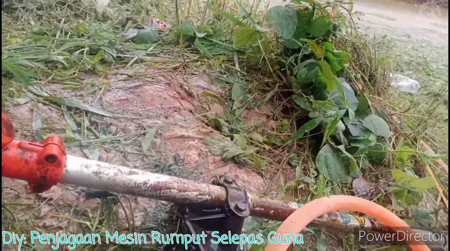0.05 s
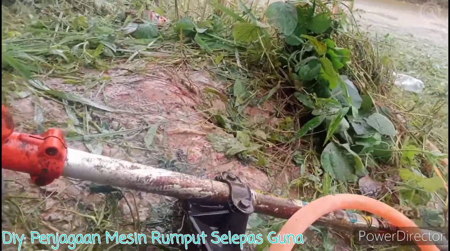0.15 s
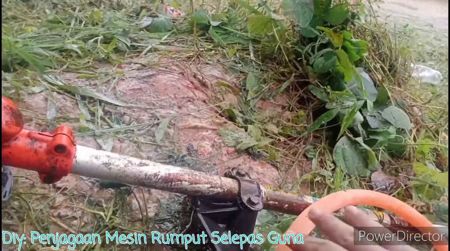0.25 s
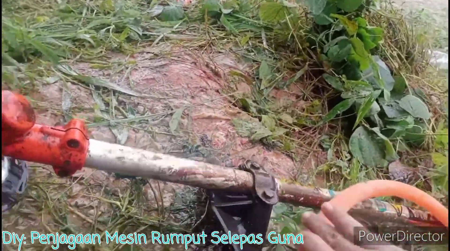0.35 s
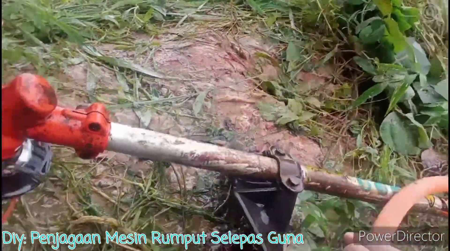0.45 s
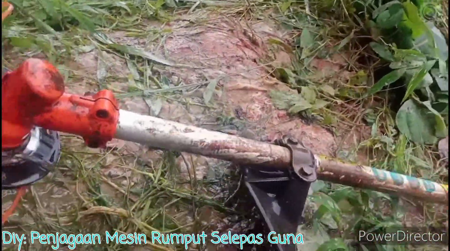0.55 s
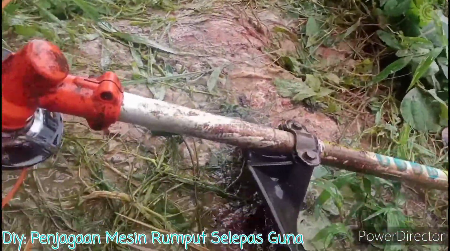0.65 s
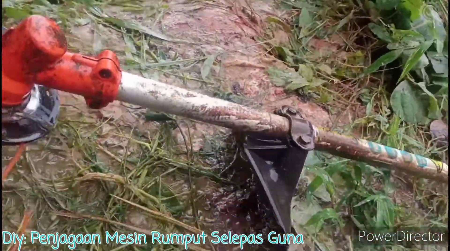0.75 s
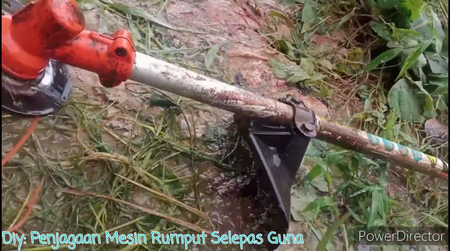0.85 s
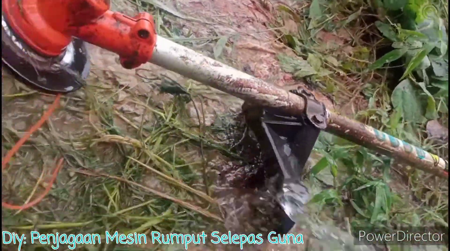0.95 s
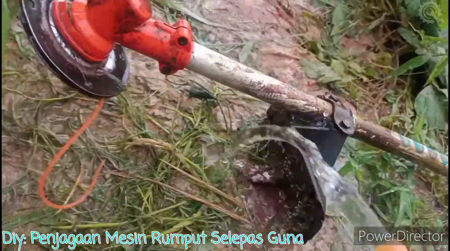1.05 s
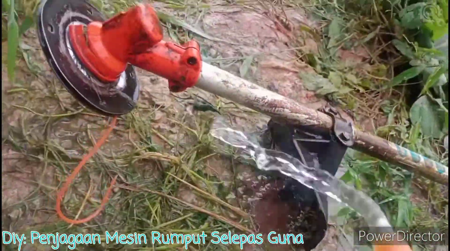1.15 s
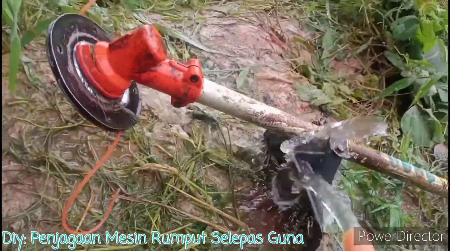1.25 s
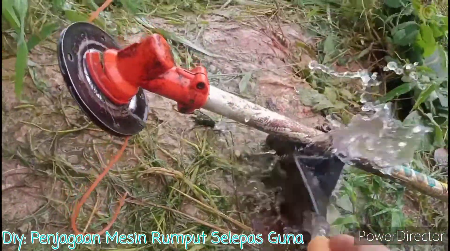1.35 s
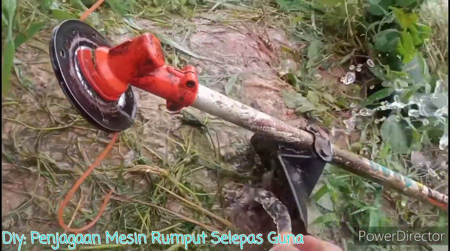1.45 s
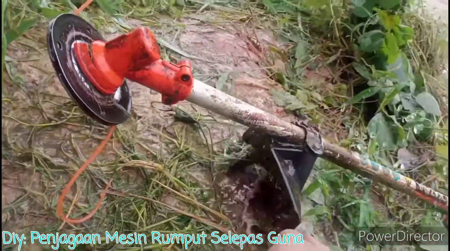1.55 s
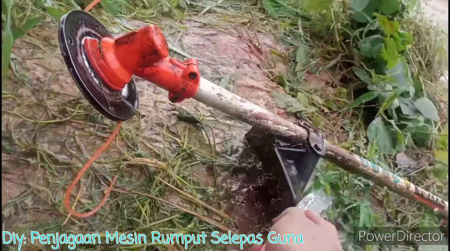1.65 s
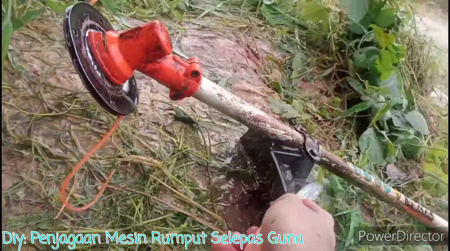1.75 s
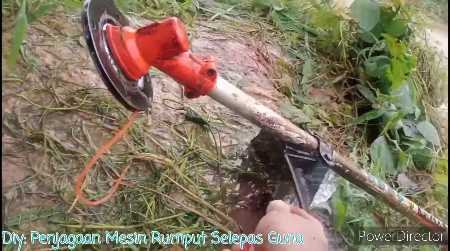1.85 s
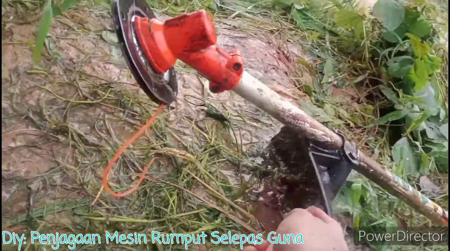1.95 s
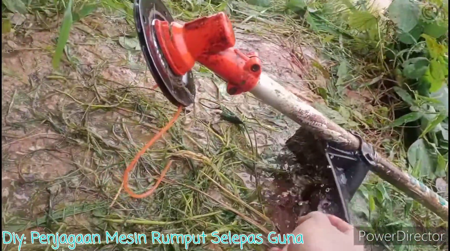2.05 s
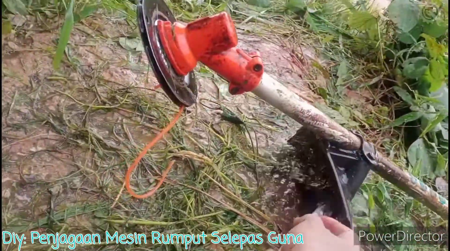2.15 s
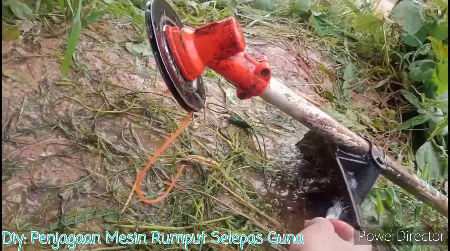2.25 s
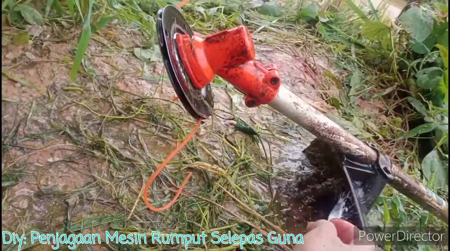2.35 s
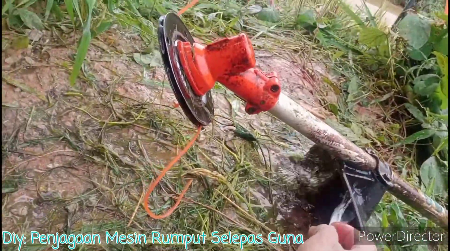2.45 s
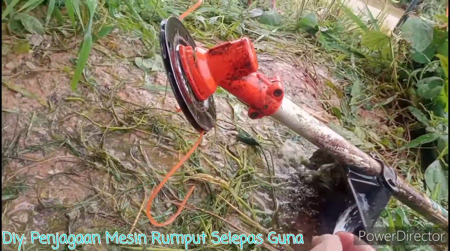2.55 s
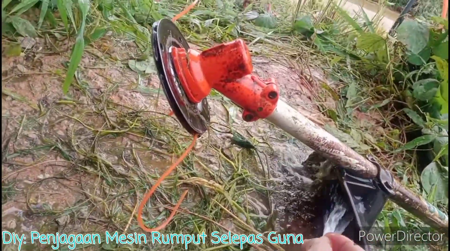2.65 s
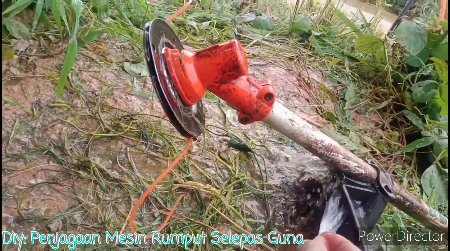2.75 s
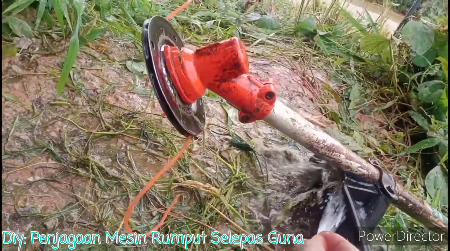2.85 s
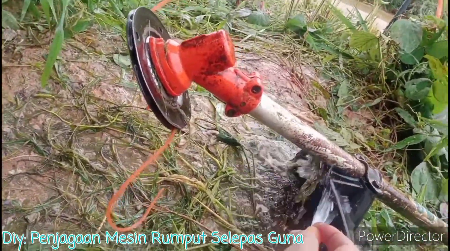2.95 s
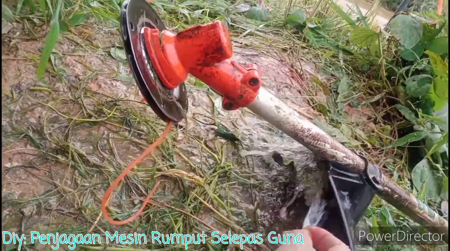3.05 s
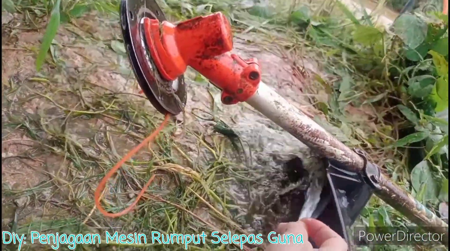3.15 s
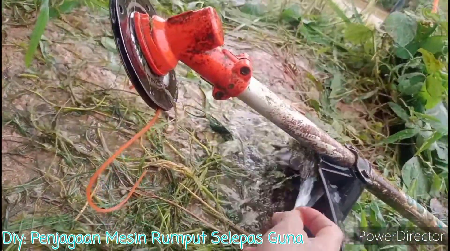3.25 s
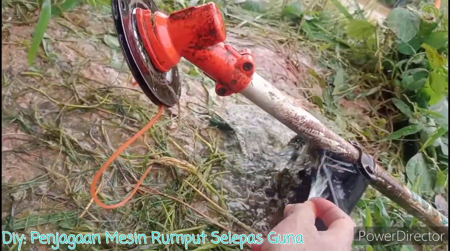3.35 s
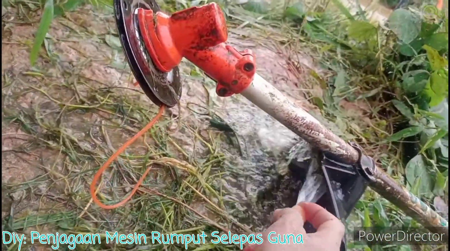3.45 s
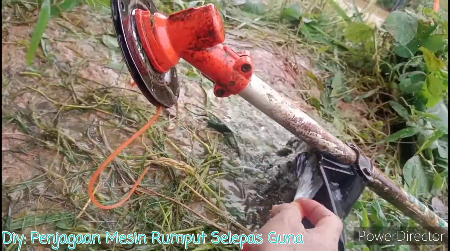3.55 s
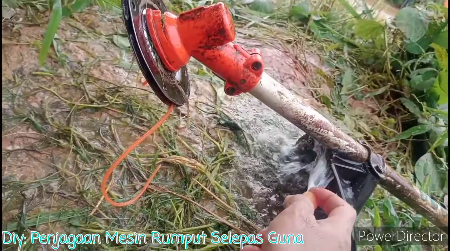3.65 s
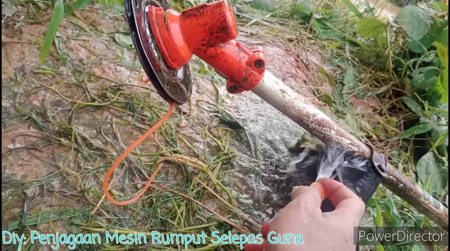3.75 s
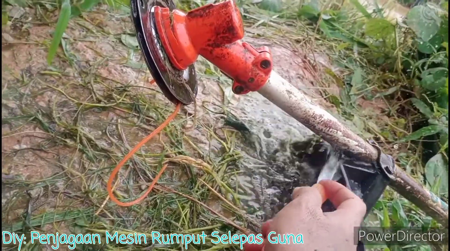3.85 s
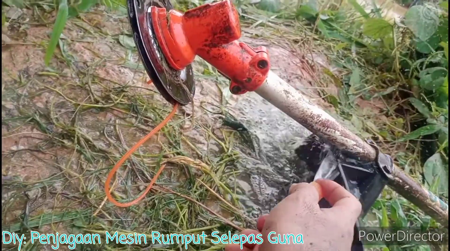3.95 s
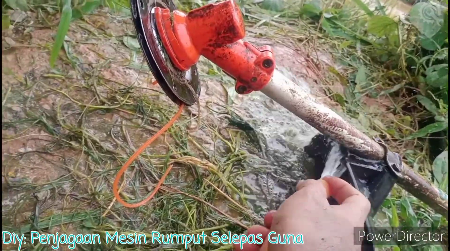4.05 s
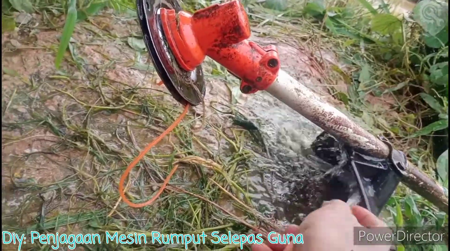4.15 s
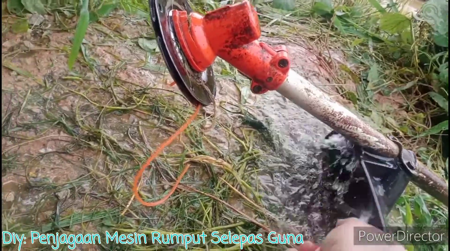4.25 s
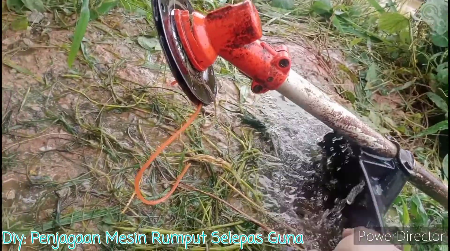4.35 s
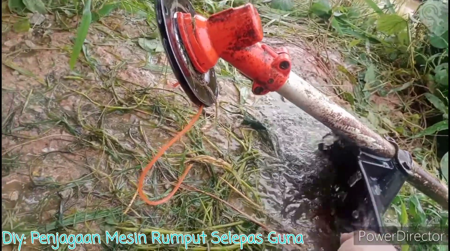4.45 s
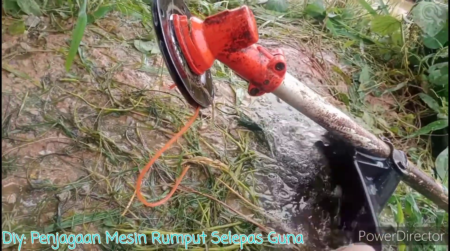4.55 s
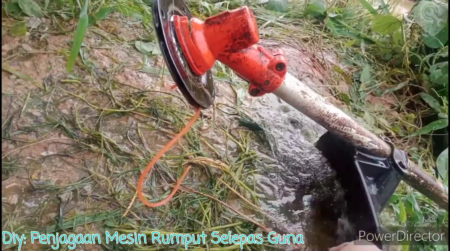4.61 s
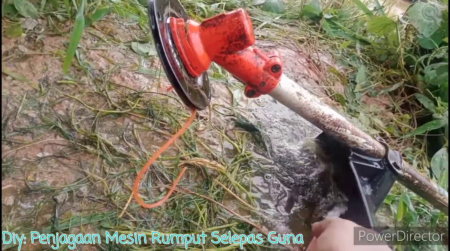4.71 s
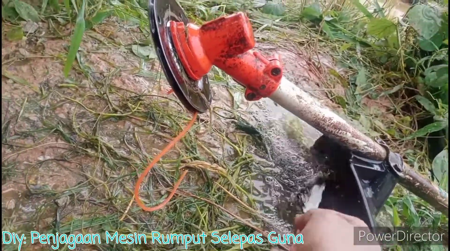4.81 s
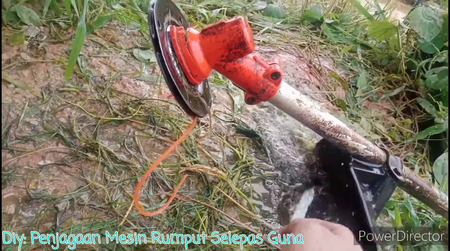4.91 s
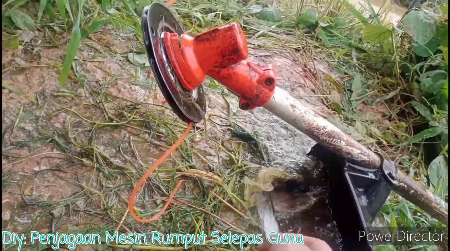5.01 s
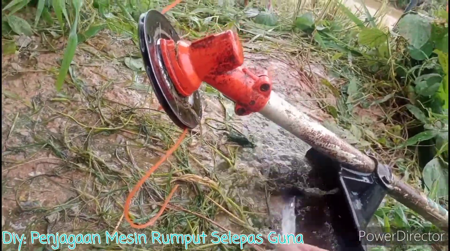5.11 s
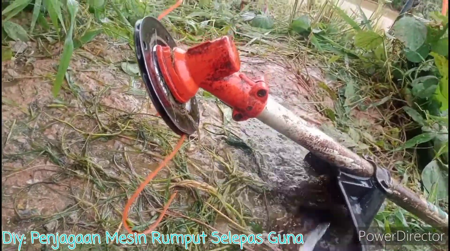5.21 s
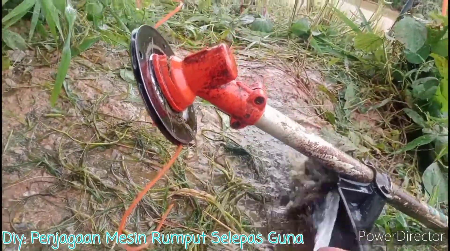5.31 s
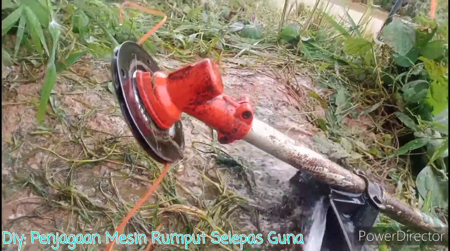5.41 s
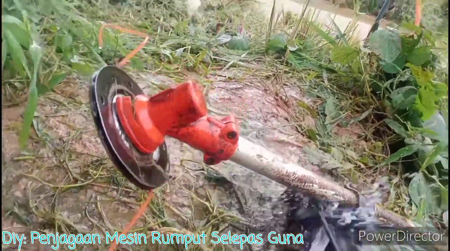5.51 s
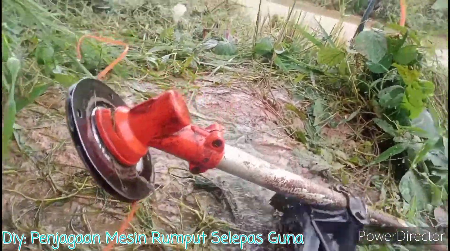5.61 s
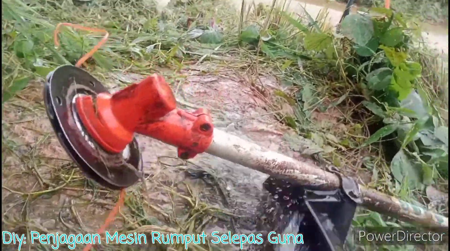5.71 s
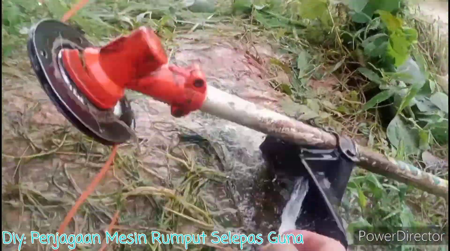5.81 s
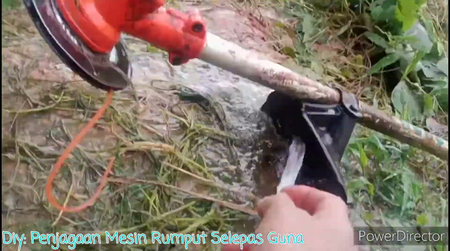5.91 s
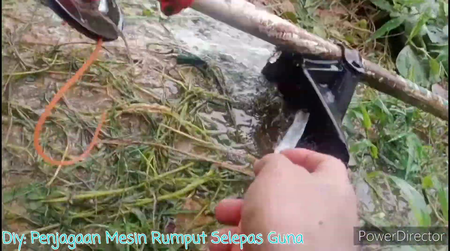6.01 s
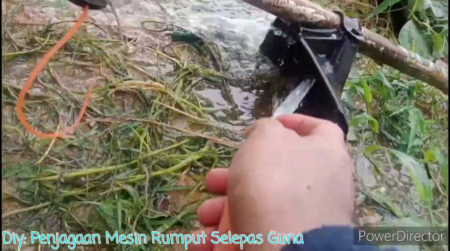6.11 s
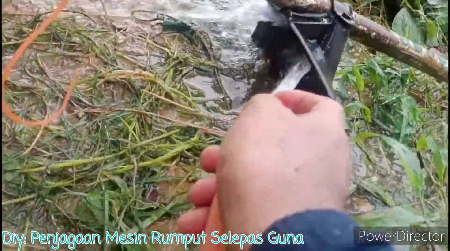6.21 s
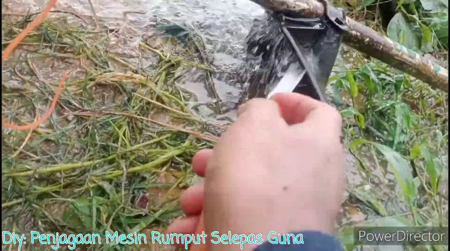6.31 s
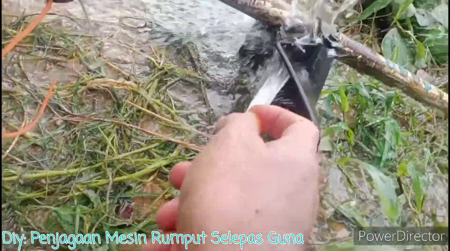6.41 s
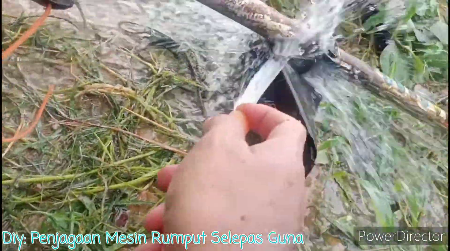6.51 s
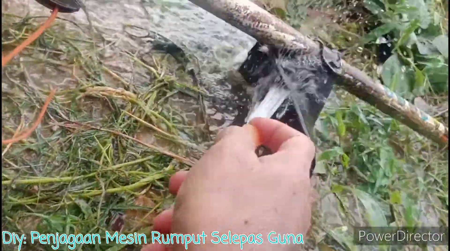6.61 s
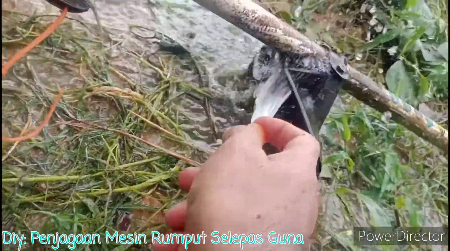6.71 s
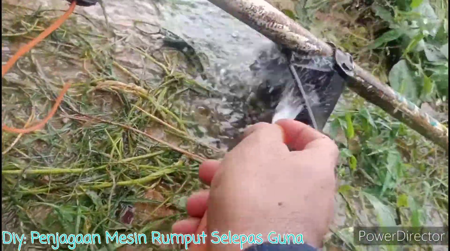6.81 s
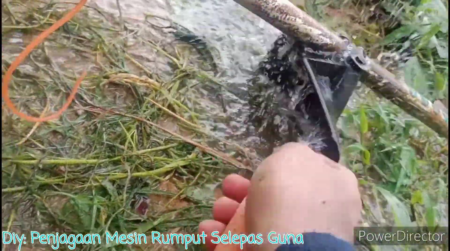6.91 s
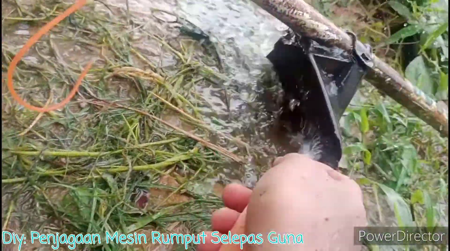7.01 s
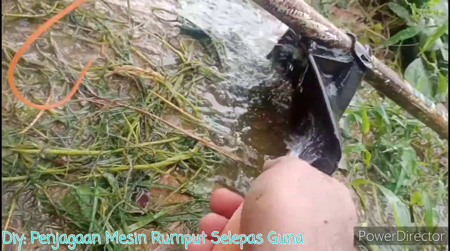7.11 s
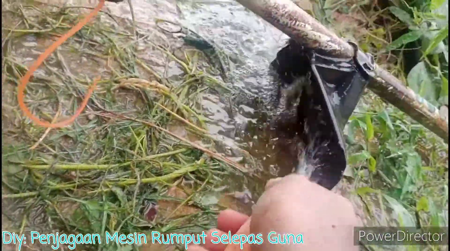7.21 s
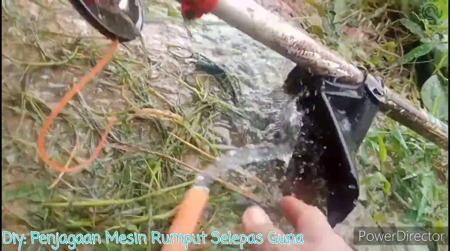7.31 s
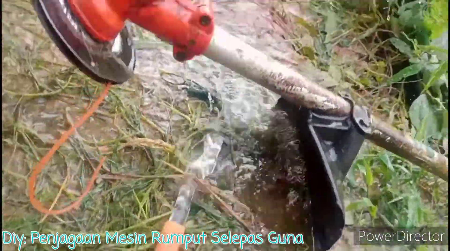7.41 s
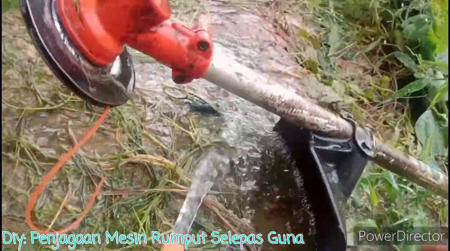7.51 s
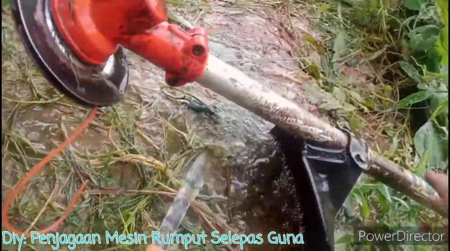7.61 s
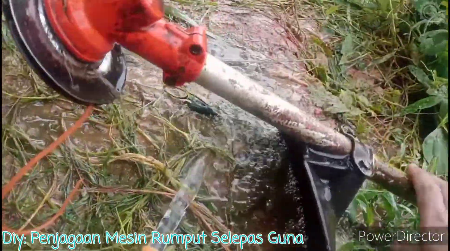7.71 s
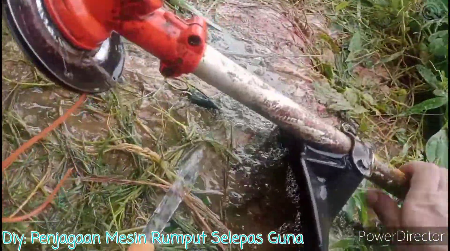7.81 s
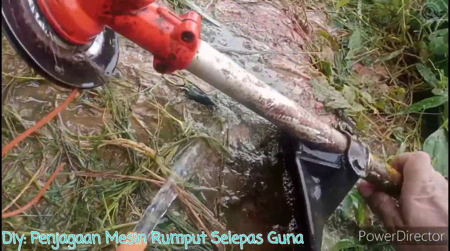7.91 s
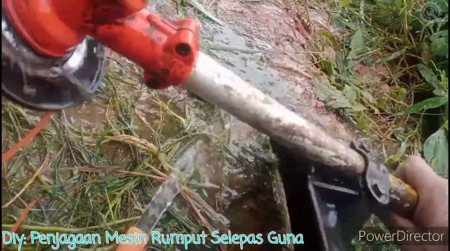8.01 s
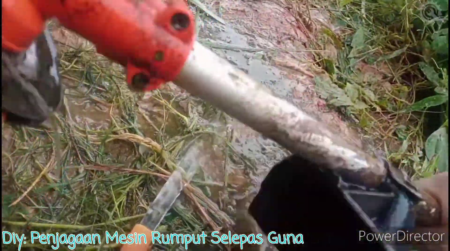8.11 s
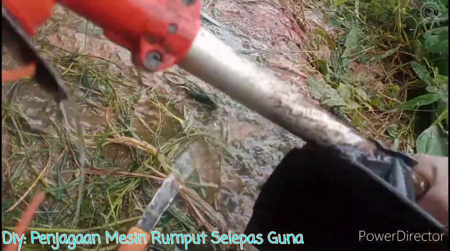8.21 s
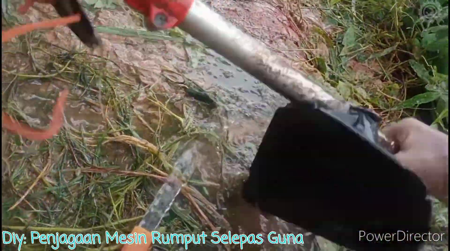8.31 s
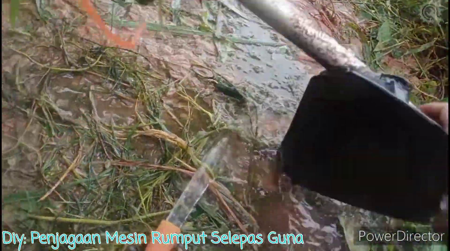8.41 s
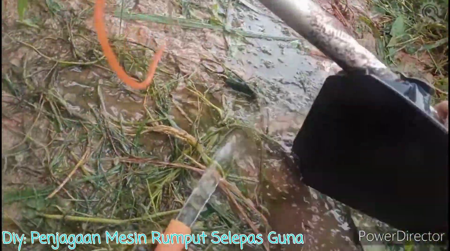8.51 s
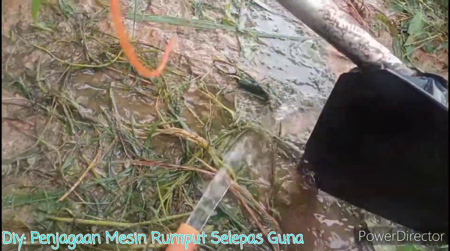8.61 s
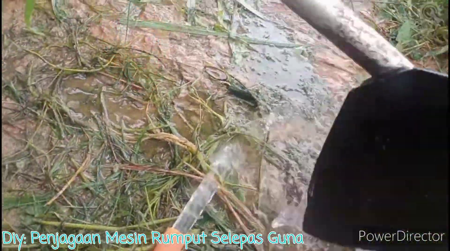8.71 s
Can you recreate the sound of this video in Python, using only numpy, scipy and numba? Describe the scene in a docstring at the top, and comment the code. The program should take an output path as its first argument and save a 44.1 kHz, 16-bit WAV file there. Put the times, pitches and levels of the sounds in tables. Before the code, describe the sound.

A garden hose trickles on wet soil close to a small microphone, with ringing bubbles and ticking drops. After two seconds the jet strikes a hollow plastic guard, hissing, splashing and gurgling in uneven surges. Past seven seconds it drops back to a thin trickle; then the turned tool knocks once hard with clatter and grit. Faint low traffic lies behind.

```python
"""Hose rinsing a trimmer guard

Outdoors, a hose trickles on soil, then its jet rinses the plastic guard of a grass trimmer.
Random ringing bubbles over noise make the water; drops crack as short noise and single bubbles ring.
The turned tool knocks: a bank of ringing modes with clatter and grit. Far off, shaped noise is traffic,
sliding sines are hums and a faint bird. A small microphone colours everything with its port resonances."""
import sys
import numpy as np
from scipy import signal
from scipy.fft import rfft, irfft
from scipy.io import wavfile
from numba import njit

SR = 44100
rng = np.random.default_rng(int(sys.argv[2]) if len(sys.argv) > 2 else 0)


def dump(signal):
    """Clip the signal to [-1, 1] and save it as 16-bit WAV at the path in sys.argv[1]."""
    limited = np.clip(np.atleast_2d(signal).T, -1, 1)
    pcm = np.round(limited * 32767).astype(np.int16)
    wavfile.write(sys.argv[1], SR, pcm)


N = 386316  # samples


def from_db(db):
    """Decibels to gain."""
    return 10 ** (np.asarray(db) / 20)


def rms_one(x):
    """Scale to rms 1."""
    return x / np.sqrt(np.mean(x ** 2) + 1e-20)


def noise():
    """White noise of spread 1."""
    return rng.standard_normal(N)


def in_time(rows):
    """Columns of a curve, joined by straight lines sample by sample."""
    s, *columns = np.transpose(rows)
    return [np.interp(np.arange(N) / SR, s, column) for column in columns]


def drift(rate_hz, count=1):
    """Slow chance: noise at every 16th sample through a double one-pole low-pass; rms 1."""
    r = np.exp(-2 * np.pi * rate_hz * 16 / SR)
    raw = rng.standard_normal((count, N // 16 + 2002))
    slow = signal.lfilter([1], [1, -2 * r, r * r], raw)[:, 2000:]  # drop the filter's start
    return np.array([np.interp(np.arange(N) / 16, np.arange(len(v)), rms_one(v)) for v in slow])


def band(x, low_hz, high_hz):
    """Band-pass."""
    return signal.sosfilt(signal.butter(2, [low_hz, high_hz], "band", fs=SR, output="sos"), x)


def peaks(x, table):
    """A chain of resonant peaks and dips, each given as hz, width_hz, gain_db."""
    for hz, width_hz, db in table:
        a, w = from_db(db / 2), 2 * np.pi * hz / SR
        q = np.pi * width_hz / SR
        top = [1 + q * a, -2 * np.cos(w), 1 - q * a]
        bottom = [1 + q / a, -2 * np.cos(w), 1 - q / a]
        x = signal.lfilter(top, bottom, x)
    return x


def ring(force, hz, t60):
    """A damped resonator: a unit click sets a sine of starting height 1 ringing."""
    r, w = from_db(-60 / (t60 * SR)), 2 * np.pi * hz / SR
    return signal.lfilter([0, np.sin(w)], [1, -2 * r * np.cos(w), r * r], force + 1e-18)


@njit
def add(out, at, size, hz, t60, rise, sr):
    """Dying sines that swell over one cycle and climb in pitch by the share rise, as bubbles nearing the surface."""
    for k in range(len(at)):
        n = min(int(t60[k] * sr), len(out) - at[k])
        for i in range(n):
            t = i / sr
            phase = 2 * np.pi * hz[k] * t * (1 + .5 * rise * t / t60[k])
            out[at[k] + i] += size[k] * np.sin(phase) * min(t * hz[k], 1.) * 1000. ** (-t / t60[k])


def bursts(at_s, db, t60):
    """Sum of envelopes that jump up and die away."""
    out = np.zeros(N)
    for s, gain, t in zip(at_s, from_db(db), np.clip(t60, .002, .3)):
        tail = gain * 1000. ** -(np.arange(int(t * SR)) / (t * SR))
        i = int(s * SR)
        out[i:i + len(tail)] += tail[:N - i]
    return out


def glides(table, flutter_db, rate_hz):
    """Thin sines that slide slowly in pitch, fade in and out, and waver in level."""
    out, flutter = np.zeros(N), from_db(flutter_db * drift(rate_hz)[0])
    for start_s, end_s, start_hz, end_hz, db in table:
        i, n = int(start_s * SR), int((end_s - start_s) * SR)
        fade = np.sqrt(2 * np.hanning(n))
        phase = 2 * np.pi * np.cumsum(np.linspace(start_hz, end_hz, n)) / SR
        out[i:i + n] += from_db(db) * fade * flutter[i:i + n] * np.sin(phase)
    return out


def gobs(per_s, fade_s):
    """The jet arrives in lumps: sudden surges that fade; rms 1."""
    lumps = (rng.random(N) < per_s / SR) * rng.exponential(1, N)
    surge = signal.lfilter([1], [1, -np.exp(-1 / (fade_s * SR))], lumps + 1e-9)
    return rms_one(surge - surge.mean())


SURGE_RISE_S, SURGE_FALL_S = 0.035, 0.054
# the jet catches an edge and surges, or slips off and falters:
# peak_s [s], spray_gain_db [dB], splash_gain_db [dB] (the gurgling takes a share of this one)
SURGES = [(.33, 1, 9), (.84, 3, 10), (1.06, -1, 5), (1.188, 5, 6.5), (1.86, 7, 7), (2.1, 3, -2.5),
          (2.77, 4, 1), (2.908, 3.5, 4.5), (3.29, 5.5, 5), (3.52, 0, -5), (3.57, 1.5, -1.5),
          (3.75, -5.5, -6.5), (4.07, 0.5, 3), (4.3, -4, -4), (4.4, -0.5, 1), (4.81, 1.5, 5),
          (4.981, 8.5, 4), (5.464, 5, 4), (5.59, 4, 4), (5.68, -2, -6), (5.72, 3, 7.5), (6.33, 8.5, -2),
          (6.434, 12.5, 1.5), (6.47, 3, 5), (6.519, -2, -13), (6.87, -5, -8), (7.11, 0.5, 1), (7.321, 8, 7),
          (8.04, -2.5, -1), (8.57, 3, 1.5)]


def surges():
    """Swells and dips in dB, setting in fast and ebbing more slowly; rows for the spray and the splashing."""
    rise, fall = int(SURGE_RISE_S * SR), int(SURGE_FALL_S * SR)
    swell = np.r_[np.hanning(2 * rise)[:rise], np.hanning(2 * fall)[fall:]]
    out = np.zeros((2, N))
    for s, spray_db, splash_db in SURGES:
        i = int(s * SR) - rise
        out[:, i:i + len(swell)] += np.outer([spray_db, splash_db], swell)
    return out


def droplets(gobs_db, centre_hz, edges_hz, per_s, cycles, spread_db, patchy_db, patch_rate,
             db_per_octave, hiss, thick):
    """Random bubbles in patches by size, favoured near the centre, over the hiss of those too small to tell apart."""
    out, patches = np.zeros(N), drift(patch_rate, count=len(edges_hz) - 1)
    for low, high, patch in zip(edges_hz, edges_hz[1:], patches):
        octaves_off = np.abs(np.log2(np.sqrt(low * high) / centre_hz))
        crowd = from_db(gobs_db + patchy_db * patch - db_per_octave * octaves_off)
        at = np.flatnonzero(rng.random(N) < per_s * crowd / SR)
        draw = rng.random((len(at), 3))
        hz = low * (high / low) ** draw[:, 0]
        # a few are far larger than the rest
        size = from_db(-spread_db * np.log(np.maximum(draw[:, 1], .01))) * np.sign(draw[:, 2] - .5)
        rings = np.zeros(N)
        add(rings, at, size * np.sqrt(crowd[at]), hz, cycles / hz, .2, SR)
        fine = thick * crowd * band(noise(), low, high)  # thin flow hisses less
        level = np.sqrt(np.mean(crowd ** 2) * (high - low))
        out += level * (rms_one(rings) + hiss * rms_one(fine))
    return rms_one(out)


CRACKLE_PER_S, CRACKLE_SPREAD_DB = 260, 4  # rate before the lumps of the jet
# pitch ranges of the dull and bright small drops: low_hz [Hz], high_hz [Hz], level_db [dB, relative]
CRACKLE_BANDS = [(3000, 4400, -6), (5000, 6600, 0.5), (6600, 7800, 1), (7700, 9100, 0), (9300, 10600, -2),
                 (12400, 19000, 1)]


def crackle(gobs_db):
    """Small drops tick at random, dull or bright, more often in the lumps of the jet; rms 1."""
    born = rng.random(N) < CRACKLE_PER_S * from_db(gobs_db) / SR
    size = from_db(CRACKLE_SPREAD_DB * np.minimum(rng.exponential(1, N), 3)) * rng.choice([-1, 1], N)
    kind = rng.integers(0, len(CRACKLE_BANDS), N)
    out = np.zeros(N)
    for k, (low, high, db) in enumerate(CRACKLE_BANDS):
        out += from_db(db) * band(born * size * (kind == k) + 1e-18, low, high)
    return rms_one(out)


HOLLOW_FADE_S = 0.014
# as the jet moves over the hollow guard, some pitches are lifted and some swallowed:
# start_s [s], end_s [s], pitch_hz [Hz], width_hz [Hz], gain_db [dB]; a row ending before its start is silent
HOLLOW = [(1.99, 5.3, 1690, 110, -16), (1.99, 2.7, 1890, 200, 4), (1.99, 2.4, 2400, 250, -10),
          (2.1, 2.5, 2900, 250, 6), (2.6, 7.3, 2357, 167.4, -3), (3.46, 3.56, 2200, 500, 5),
          (3.57, 3.9, 1310, 500, 9), (3.62, 4.2, 1990, 300, -4), (4.67, 4.5, 750, 302, 8.5),
          (4.75, 5.2, 2960, 202, 6), (4.75, 5.3, 3470, 150, 0), (4.75, 5.3, 3220, 120, -5),
          (4.8, 4.4, 1500, 250, 5), (5.08, 5.3, 596, 400, 4), (5.22, 5.29, 2050, 250, 12),
          (5.3, 7.3, 1680, 200, -9), (6.4, 6.7, 2500, 200, 9), (6.55, 7.2, 3660, 400, -1),
          (6.4, 6.7, 1240, 200, 8)]


def hollow(x):
    """Each lift or dip fades in, holds while the jet stays on that spot, and fades out."""
    t = np.arange(N) / SR
    for start_s, end_s, *peak in HOLLOW:
        share = np.clip(np.minimum(t - start_s, end_s - t) / HOLLOW_FADE_S, 0, 1)
        x = x + share * (peaks(x, [peak]) - x)
    return x


GURGLE_WANDER = .15  # octaves
THIN_DB, THIN_LUMPS = -38., .07  # below this spray level the lumps deepen by this share per dB
CRACKLE_DB = -5.5  # against the spray
# the water as the hose is lifted, aimed and laid down, ahead of surges and microphone:
# time_s [s], spray_db [dB], splash_db [dB], gurgle_db [dB], gurgle_centre_hz [Hz]
WATER = [(0.0, -49, -49.5, -51.5, 649), (.9, -50.5, -51, -53.5, 550), (1.006, -48, -55, -53, 600),
         (1.012, -38.5, -38, -47, 800), (1.035, -44, -47.5, -54, 800), (1.15, -42, -43.5, -49, 850),
         (1.75, -45, -45, -49, 712), (1.988, -51, -46.5, -52, 809), (1.997, -42.5, -37, -43, 1300),
         (2.04, -37, -36, -42, 1210), (2.3, -38, -39.5, -43, 671), (3.3, -36.5, -37.5, -43, 830),
         (3.62, -33.5, -36, -42, 1260), (3.8, -33, -37.5, -42.5, 854), (4.25, -36.5, -39, -44, 803),
         (4.62, -34, -37, -45, 842), (4.78, -37, -38, -40, 850), (5.28, -34, -36, -40.5, 800),
         (5.4, -37, -42, -46, 646), (5.65, -36.5, -39, -45.5, 755), (5.9, -38, -38.5, -39.5, 635),
         (6.15, -37, -37.5, -43, 676), (6.4, -40, -42.5, -52, 720), (6.6, -31.5, -36.5, -43.5, 1070),
         (7.2, -37, -36.5, -44.5, 1010), (7.36, -42, -41.5, -57.5, 1027), (7.55, -45, -45, -54, 1177),
         (7.75, -48.5, -46, -52, 950), (8.0, -47, -45, -52.5, 837), (8.45, -47.5, -44.5, -51.5, 812),
         (8.76, -44.5, -39, -48.5, 1000)]
# the mist against the spray: time_s [s], level_db [dB]
MIST = [(0, -1), (.7, -2), (1.3, -1), (2.2, -4.5), (2.7, 0.5), (3.0, -2.5), (3.6, -2.5), (4.3, -4),
        (5.0, 0), (6.3, 1.5), (6.9, -1.5), (7.5, -2.5), (8.76, -2.5)]


def water():
    """The jet breaks into gobs: mist, spray, splashing and gurgling surge partly together."""
    spray_db, splash_db, gurgle_db, centre_hz = in_time(WATER)
    mist_db = in_time(MIST)[0]
    high_db, low_db = surges()
    gurgle_hz = centre_hz * 2 ** (GURGLE_WANDER * drift(6.)[0])
    lumpy = 1 + THIN_LUMPS * np.maximum(THIN_DB - spray_db, 0)
    gobs_db = lumpy * (.8 * gobs(80., .01) + .6 * drift(150.)[0])
    mist = droplets(gobs_db, 14000., np.geomspace(10500., 17000., num=3), per_s=300., cycles=2.8,
                    spread_db=1.3, patchy_db=1.9, patch_rate=40., db_per_octave=0.1,
                    hiss=0.87, thick=1 / lumpy)
    spray = droplets(gobs_db, 8000., np.geomspace(4800., 10500., num=7), per_s=220., cycles=10.0,
                     spread_db=3.2, patchy_db=3.0, patch_rate=35., db_per_octave=0.1,
                     hiss=1.0, thick=1 / lumpy)
    splash = droplets(gobs_db, 3000., np.geomspace(1500., 4900., num=9), per_s=90., cycles=22.5,
                      spread_db=2.6, patchy_db=2.4, patch_rate=18., db_per_octave=1.4,
                      hiss=0.99, thick=1 / lumpy)
    gurgle = droplets(.7 * gobs_db, gurgle_hz, np.geomspace(380., 1550., num=8), per_s=40., cycles=16.0,
                      spread_db=1.6, patchy_db=2.8, patch_rate=8.0, db_per_octave=4.0,
                      hiss=1.43, thick=1)
    fine = spray + from_db(CRACKLE_DB) * crackle(gobs_db) + from_db(mist_db) * mist
    fine = from_db(spray_db + high_db) * fine
    coarse = from_db(splash_db + low_db) * splash + from_db(gurgle_db + 0.47 * low_db) * gurgle
    return fine + hollow(coarse)


# colour of the far road: pitch_hz [Hz], level_db [dB, relative]
TRAFFIC = [(18, -42), (30, -16), (48, -3), (68, -9.5), (100, 0), (131, 1.5), (160, -1.5), (333, -13.5),
           (421, -13.5), (478, -12), (945, -25), (1400, -22), (2200, -23), (2860, -32), (4840, -120)]
# its level ahead of the microphone: time_s [s], level_db [dB]
TRAFFIC_DB = [(0.0, -43), (0.83, -41.5), (1.32, -41), (2.0, -42), (3.58, -42), (4.5, -41.5), (6.34, -43),
              (7.46, -46.5), (8.76, -44)]


def traffic():
    """Steady, mostly low noise of a far road: white noise shaped in its spectrum."""
    hz, table = np.fft.rfftfreq(N, 1 / SR) + 1, np.array(TRAFFIC)
    shape = from_db(np.interp(np.log(hz), np.log(table[:, 0]), table[:, 1], right=-90))
    rumble = rms_one(irfft(rfft(noise()) * shape, N))
    return from_db(in_time(TRAFFIC_DB)[0]) * rumble


# bubbles close by that ring out singly: start_s [s], level_db [dB], start pitch_hz [Hz]
BUBBLES = [(0.0505, -22.5, 4200), (0.0936, -32, 4140), (0.133, -30, 4410), (0.186, -34, 3940),
           (0.3062, -32, 3400), (0.3446, -32, 3370), (0.4038, -33, 3430), (0.499, -33, 1950),
           (0.6604, -36, 1950), (0.7073, -32.5, 2750), (0.7953, -27, 2950), (0.827, -23, 1850),
           (0.9044, -30.5, 2010), (0.9472, -32.5, 2830), (1.0136, -33, 3300), (1.0966, -17, 2900),
           (1.18, -22, 3820), (1.2617, -24.5, 2900), (1.3672, -22.5, 3720), (1.601, -20, 4000),
           (1.857, -16.5, 2630), (1.8831, -24, 1980), (1.998, -27, 2950), (2.003, -24, 1190),
           (2.004, -29, 1950), (2.028, -18.5, 3800), (2.031, -26, 1950), (2.05, -26, 2020),
           (2.1101, -23.5, 1800), (2.157, -24.5, 1890), (2.193, -25, 875), (2.25, -27, 600),
           (2.313, -26, 2100), (2.286, -16, 2780), (2.412, -20, 2900), (2.736, -23, 3760),
           (2.9521, -19.5, 2960), (3.1418, -23, 2820), (3.3692, -20.5, 2250), (3.462, -20, 2180),
           (3.5685, -24, 3490), (3.579, -23, 1480), (3.64, -30, 1340), (3.772, -29, 780),
           (3.8304, -12, 3220), (4.0463, -26.5, 3165), (4.3677, -14, 4100), (4.68, -27, 1117),
           (4.715, -29, 790), (4.775, -18.5, 2900), (4.789, -18.5, 2900), (4.811, -17.5, 2920),
           (5.019, -16, 3340), (5.193, -26, 920), (5.256, -18.5, 2045), (5.5832, -15.5, 3550),
           (5.7063, -14, 3330), (5.909, -17, 3370), (6.422, -19, 2540), (6.6216, -20.5, 3630),
           (6.6653, -22, 3580), (6.7005, -20, 3440), (6.884, -17.5, 3510), (6.955, -29, 900),
           (7.1116, -19, 3430), (7.1277, -18, 3220), (7.3166, -19, 3450), (7.478, -29, 2230),
           (7.503, -30.5, 1080), (7.6251, -32.5, 2280), (7.666, -28, 2340), (7.712, -35.5, 1010),
           (7.779, -30.5, 1760), (8.025, -28, 2030), (8.693, -29, 1780), (8.735, -25.5, 1750)]


def bubbles():
    """A pocket of air rings with climbing pitch; two smaller neighbours follow."""
    s, db, hz = np.transpose(BUBBLES)
    out, draw = np.zeros(N), rng.standard_normal((len(s), 3, 2))
    for k in range(3):
        at = ((s + 0.0031 * k * np.abs(draw[:, k, 0])) * SR).astype(np.int64)
        pitch_hz = hz * (1 + 0.069 * k * np.tanh(draw[:, k, 1]))
        add(out, at, from_db(db - 2.5 * k), pitch_hz, 25.3 / hz, .08, SR)
    return out


# faint steady tones, probably far engines:
# start_s [s], end_s [s], start_hz [Hz], end_hz [Hz], level_db [dB]
HUMS = [(.08, .75, 526, 526, -53), (1.0, 3.2, 92, 94.4, -50.5), (.9, 1.9, 136, 140.9, -47.5),
        (3.7, 5.1, 107, 105.7, -46), (4.2, 5.1, 129.4, 127.4, -48), (5.2, 6.3, 116, 120.1, -50.5),
        (6.15, 6.75, 130.3, 103.4, -45.5)]


def hums():
    """Far hums: nearly steady sines wavering slowly in level."""
    return glides(HUMS, 2.3, 2.7)


SNAP_DB = -9  # first contact of a splat, against its level
# drops cracking on a hard or wet surface, ahead of band-passes and microphone:
# start_s [s], level_db [dB], level of the tick in the top treble tick_db [dB]
SPLATS = [(0.2114, -26, -21), (0.237, -24.5, -35), (0.295, -27, -22), (0.317, -26, -35), (0.3512, -31, -19),
          (0.465, -30, -38), (0.477, -26, -38), (0.489, -31, -38), (0.4985, -25, -39), (0.748, -36, -18),
          (0.797, -22, -35), (0.879, -14.5, -22), (1.011, -26, -20), (1.0152, -20, -20),
          (1.0185, -18.5, -16), (1.056, -13.5, -33), (1.072, -23, -28), (1.108, -27, -28),
          (1.149, -29, -29.5), (1.1775, -19, -12.5), (1.18, -17, -30), (1.267, -23, -30),
          (1.275, -24, -30.5), (1.318, -19.5, -32), (1.4177, -19.5, -35.5), (1.4744, -16, -25),
          (1.5656, -19.5, -33), (1.755, -17, -33), (1.7858, -20, -35), (1.8545, -16, -23),
          (1.866, -14.5, -28), (1.8836, -25, -21), (2.03, -19, -21.5), (2.1853, -17, -27),
          (2.346, -18.5, -33), (2.4297, -17, -28), (2.6943, -19, -14), (2.7367, -14, -11.5),
          (3.18, -28, -17), (3.272, -25, -28), (3.4213, -17, -15), (3.438, -17.5, -28), (3.522, -18, -28.5),
          (3.5404, -25, -14), (3.662, -25, -30), (3.75, -17, -28), (3.79, -24, -28), (3.856, -12, -26),
          (4.141, -12, -26.5), (4.1607, -16, -26), (4.356, -11.5, -25), (4.464, -11.5, -22.5),
          (4.48, -14.5, -19), (4.9266, -12.5, -18), (5.014, -13.5, -20), (5.196, -32, -10),
          (5.229, -15, -12), (5.2964, -24, -22), (5.315, -16, -10.5), (5.425, -15.5, -24),
          (5.449, -13, -15.5), (5.464, -10.5, -5), (5.472, -5.5, -3), (5.602, -13.5, -22),
          (5.804, -11, -26), (5.8386, -14.5, -16), (5.909, -21, -24), (5.922, -14.5, -9),
          (5.965, -14.5, -18), (6.139, -30, -12.5), (6.2654, -13, -16), (6.3286, -10, -18),
          (6.353, -20, -13), (6.415, -12, -20), (6.426, -12, -18), (6.432, -8, -20), (6.444, -5.5, -20),
          (6.472, -12, -22), (6.5774, -11, -14), (6.6672, -13, -21), (6.8511, -15, -26),
          (7.1075, -25.5, -10), (7.324, -12.5, -28), (7.5283, -19, -26), (7.6237, -17.5, -18),
          (7.714, -27, -27.5), (7.7999, -24.5, -33), (7.868, -24.5, -27.5), (8.1206, -23, -36),
          (8.4746, -26, -36)]


def snaps(clicks):
    """A click as a drop's first contact: broad and under a millisecond; a unit click peaks near 1."""
    return 2 * band(clicks + 1e-18, 5700.0, 13500.0)


def splats():
    """Each drop snaps, then gives a few milliseconds of noise, with a tick of its own above."""
    s, db, tick_db = np.transpose(SPLATS)
    clicks, t60 = np.zeros(N), np.full(len(s), 0.012)
    clicks[(s * SR).astype(int)] = from_db(db + SNAP_DB)
    crack = bursts(s, db, t60) * band(noise(), 5700.0, 10200.0)
    tick = bursts(s, tick_db, t60) * band(noise(), 13300.0, 20000.0)
    return snaps(clicks) + crack + tick


# faint bird whistles: start_s [s], end_s [s], start_hz [Hz], end_hz [Hz], level_db [dB]
BIRD = [(.63, 0.682, 8100, 8000, -68), (7.875, 7.96, 3850, 3730, -53), (7.96, 8.06, 3710, 3590, -53)]


def bird():
    """A bird whistles faintly: short sines sliding down, with a quick flutter in level."""
    return glides(BIRD, 4.0, 50.)


# gurgles at one drifting pitch, as a pocket in the puddle fills or drains:
# start_s [s], end_s [s], start_hz [Hz], end_hz [Hz], level_db [dB]
GURGLES = [(1.1, 1.125, 2900, 3000, -50), (7.395, 7.43, 1150, 1070, -50), (7.495, 7.56, 980, 1103, -52),
           (7.51, 7.57, 1213, 1326, -50), (7.645, 7.72, 1196, 1150, -53), (7.725, 7.775, 960, 874, -51),
           (7.885, 7.95, 760, 800, -53.5), (8.005, 8.025, 1760, 1780, -47), (8.035, 8.06, 1540, 1590, -46),
           (8.07, 8.09, 1470, 1490, -45), (8.52, 8.545, 1980, 2000, -46), (8.705, 8.73, 3620, 3550, -45.5)]


def gurgles():
    """A run of bubbles as one sliding sine, its level fluttering fast."""
    return glides(GURGLES, 5.5, 120.)


CONTACT_S = 0.00029  # the plastic gives a little, so a blow is a short push
CLATTER_WIDTH_HZ, CLATTER_LIFT_DB = 170, 3  # the clatter too is lifted at the modes of the guard
# the tool knocks on the ground, ahead of filters and microphone:
# start_s [s], blow_db [dB], clatter_db [dB], grit_db [dB], t60_s [s] of the grit (the clatter lasts longer)
KNOCKS = [(5.112, -24, -37, -25, 0.016), (5.119, -19, -25, -36, 0.037), (5.146, -23, -18, -30, 0.016),
          (8.093, -47, -23, -53, 0.042), (8.2571, 5.5, -8, -20.5, 0.023), (8.265, -33, -16, -23, 0.026),
          (8.281, -29, -18, -28, 0.02), (8.288, -19, -21, -27, 0.062), (8.309, -19, -21, -25, 0.016),
          (8.327, -24, -32, -30, 0.015), (8.335, -26, -36, -36, 0.008), (8.3545, -17, -12, -22, 0.014),
          (8.357, -13, -11.5, -14, 0.012), (8.3615, -17.5, -9, -7.5, 0.0073),
          (8.366, -20, -21.5, -26, 0.042), (8.392, -30, -38, -50, 0.008), (8.404, -47, -25, -23, 0.018),
          (8.529, -46, -41, -24, 0.015), (8.553, -53, -44, -29, 0.0099), (8.586, -22, -25, -21, 0.014),
          (8.591, -23, -30, -35, 0.015)]
# ringing modes of the guard: pitch_hz [Hz], level_db [dB], t60_s [s]
GUARD = [(166, -18, 0.27), (257.5, -19.5, 0.074), (513, -21, 0.13), (647, -18.5, 0.058), (760, -27.5, 0.22),
         (786, -6, 0.026), (967, -14, 0.018), (1045, -30, 0.1), (1429, -25.5, 0.032), (1630, -26, 0.036),
         (2490, -25, 0.098), (2700, -31, 0.04), (2900, -28, 0.09), (3380, -28, 0.12)]
# colour of the grit: pitch_hz [Hz], width_hz [Hz], gain_db [dB]
GRIT_LIFT = [(6170, 1800, 7.5), (9600, 3600, -5.5)]


def knocks():
    """Each blow rings the modes of the guard; loose parts clatter and grit rattles after it."""
    s, db, clatter_db, grit_db, t60 = np.transpose(KNOCKS)
    at, body = (s * SR).astype(int), np.zeros(N)
    luck_db = 1.2 * rng.standard_normal((len(s), len(GUARD)))  # each blow excites the modes unevenly
    shake = 0.006 * bursts(s, db, np.full(len(s), 0.16)) * noise()  # the guard keeps chattering
    for k, (hz, mode_db, mode_t60) in enumerate(GUARD):
        force = shake.copy()
        force[at] -= from_db(db + luck_db[:, k])
        body += from_db(mode_db) * ring(force, hz, mode_t60)
    push = np.hanning(int(CONTACT_S * SR) + 2)
    body = signal.lfilter(push / push.sum(), [1], body)
    body = band(body, 324.0, 5400.0)  # a small plate radiates no deep bass
    clatter = bursts(s, clatter_db, 1.97 * t60) * band(noise(), 540.0, 3900.0)
    clatter = 0.73 * peaks(clatter, [(hz, CLATTER_WIDTH_HZ, CLATTER_LIFT_DB) for hz, _, _ in GUARD])
    grit = peaks(bursts(s, grit_db, t60) * band(noise(), 3900.0, 20000.0), GRIT_LIFT)
    return body + clatter + grit


def scene():
    """All sources, near and far, at one microphone: one channel."""
    near = water() + bubbles() + splats() + gurgles() + knocks()
    far = traffic() + hums() + bird()
    return (near + far)[None]


MIC_DB, BASS_CUT_HZ, CUTOFF_HZ = -3, 40, 15650  # overall gain, then the cuts at both ends
# port resonances and dips of the small microphone: pitch_hz [Hz], width_hz [Hz], gain_db [dB]
MIC = [(3470, 2100, 5.5), (8260, 1780, 9), (16400, 12000, -2), (5120, 2380, -5.5)]


def record(dry):
    """Resonances of the microphone port, then the cuts at both ends."""
    x = peaks(dry * from_db(MIC_DB), MIC)
    x = signal.sosfilt(signal.butter(10, BASS_CUT_HZ, "high", fs=SR, output="sos"), x)
    return signal.sosfilt(signal.ellip(10, .5, 70, CUTOFF_HZ, fs=SR, output="sos"), x)


dry = scene()
out = record(dry)
dump(out)
```